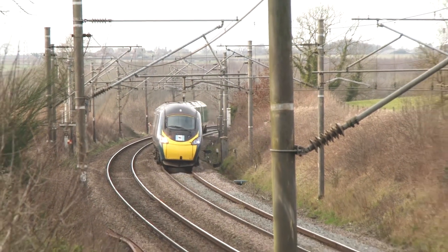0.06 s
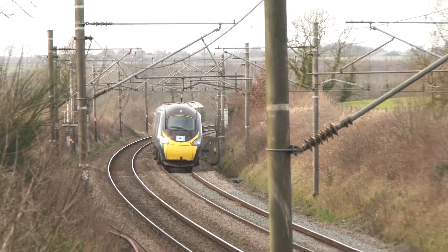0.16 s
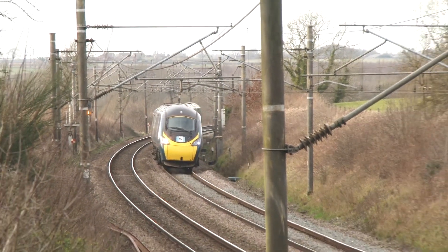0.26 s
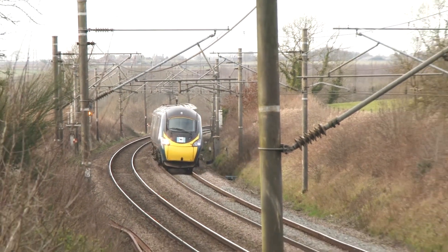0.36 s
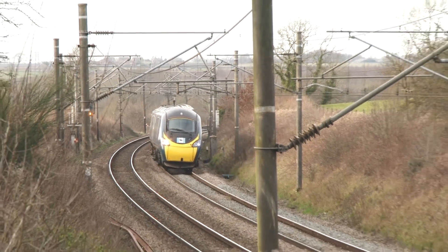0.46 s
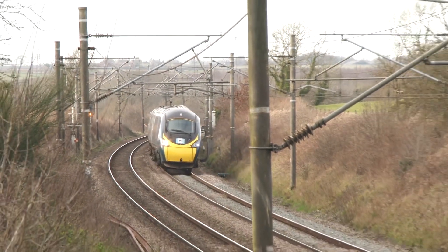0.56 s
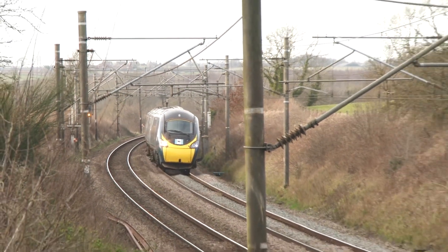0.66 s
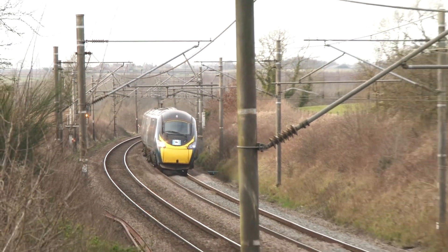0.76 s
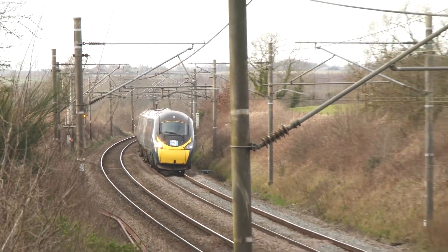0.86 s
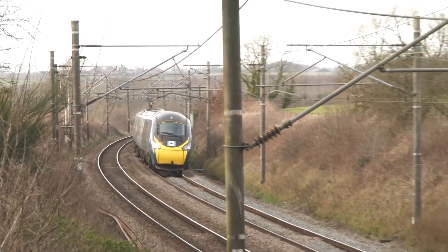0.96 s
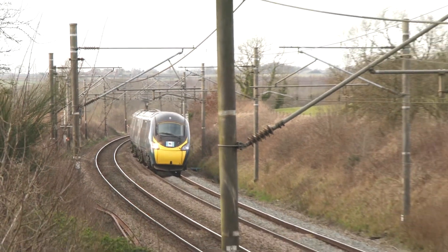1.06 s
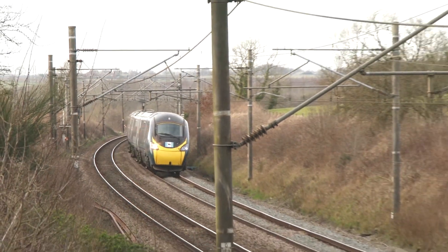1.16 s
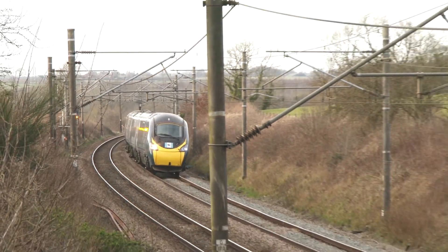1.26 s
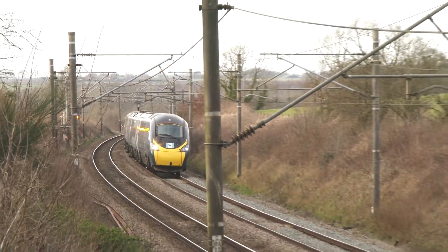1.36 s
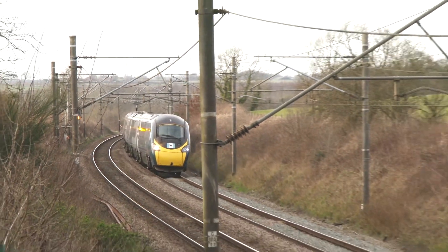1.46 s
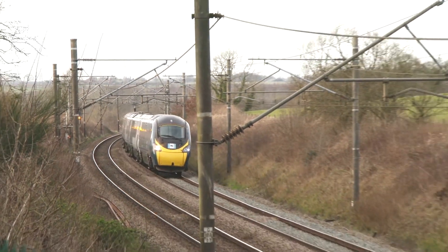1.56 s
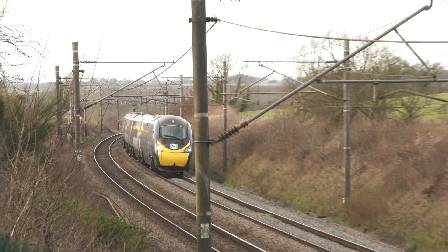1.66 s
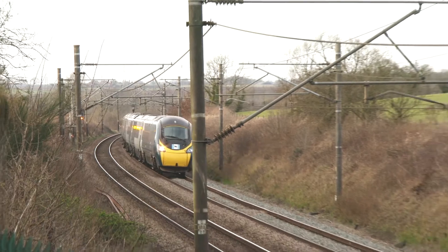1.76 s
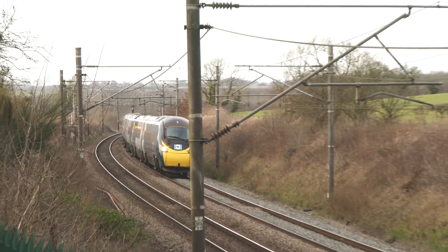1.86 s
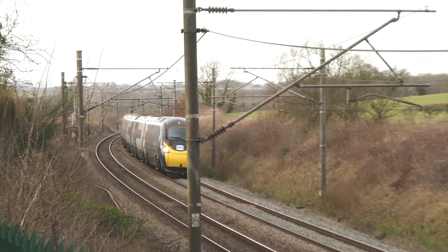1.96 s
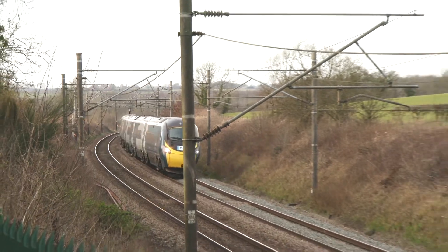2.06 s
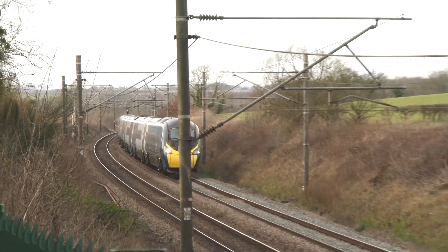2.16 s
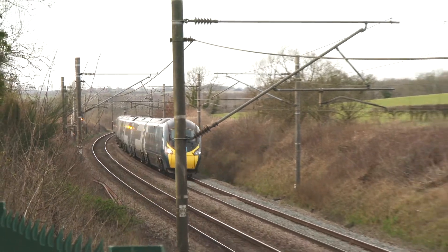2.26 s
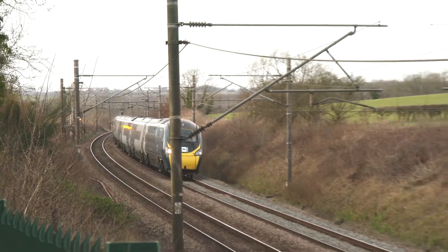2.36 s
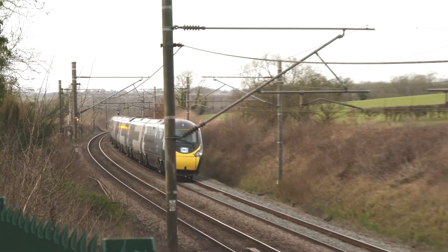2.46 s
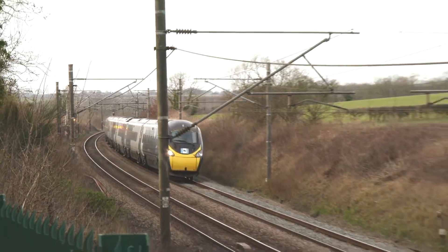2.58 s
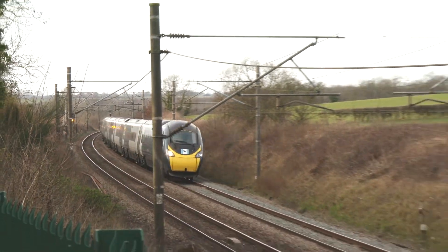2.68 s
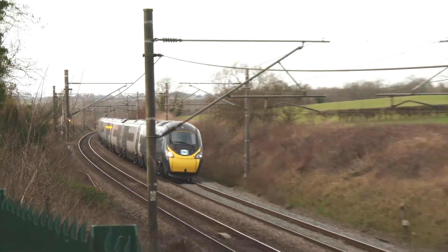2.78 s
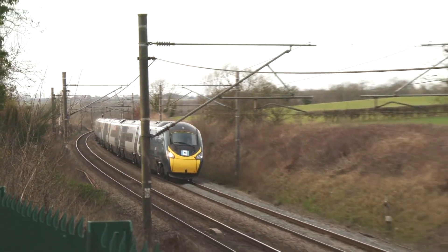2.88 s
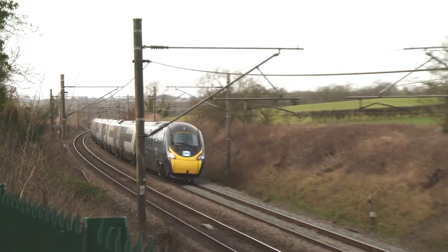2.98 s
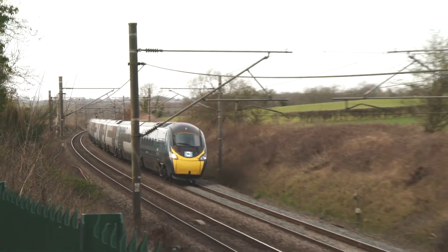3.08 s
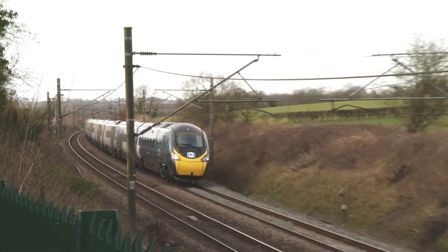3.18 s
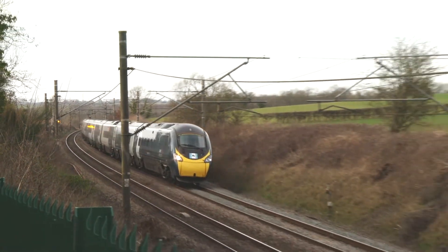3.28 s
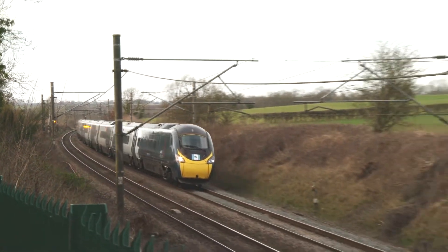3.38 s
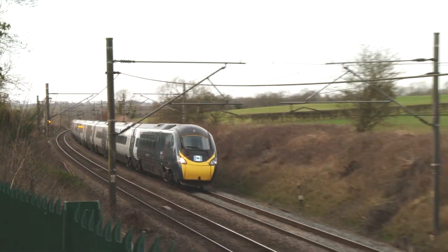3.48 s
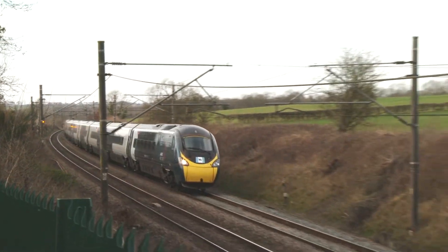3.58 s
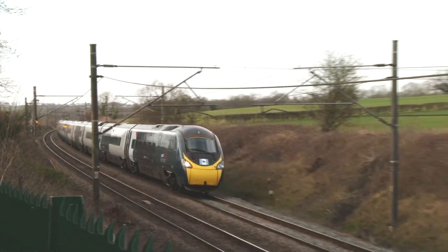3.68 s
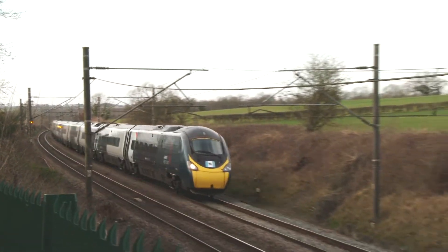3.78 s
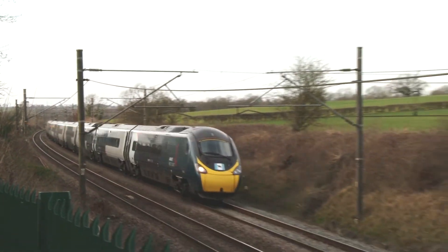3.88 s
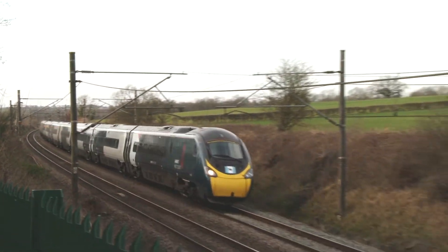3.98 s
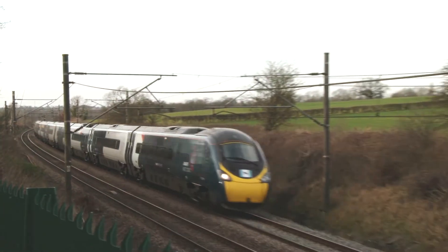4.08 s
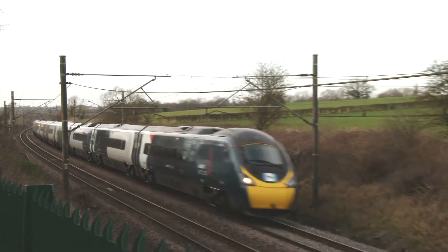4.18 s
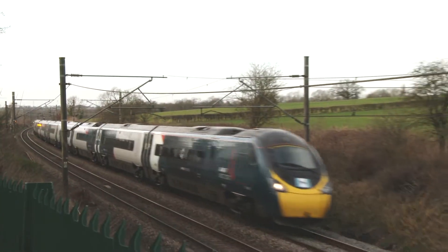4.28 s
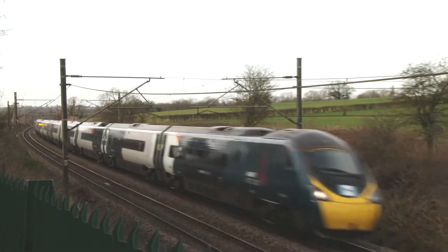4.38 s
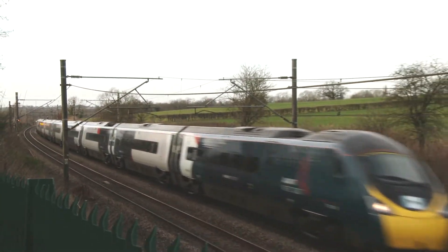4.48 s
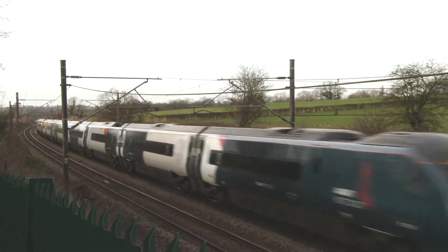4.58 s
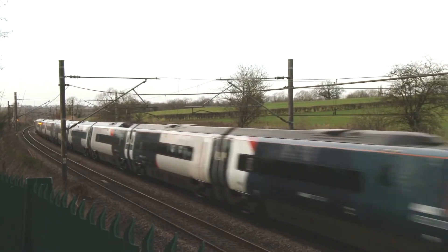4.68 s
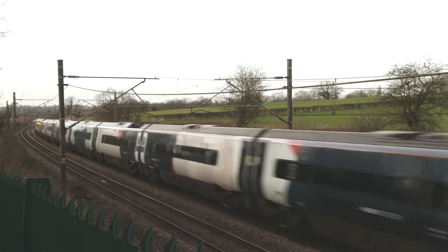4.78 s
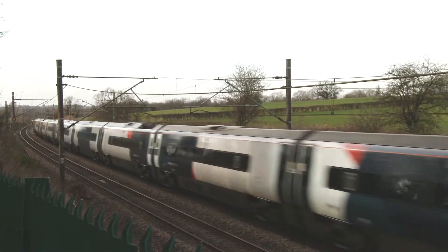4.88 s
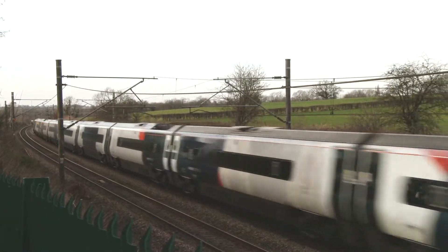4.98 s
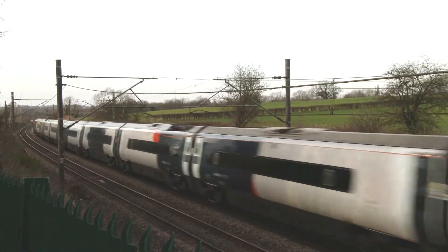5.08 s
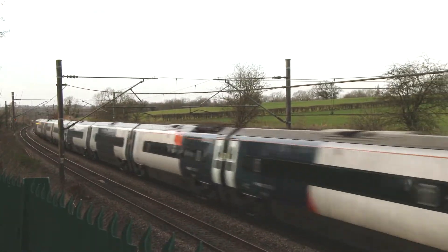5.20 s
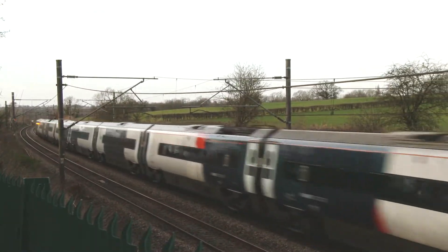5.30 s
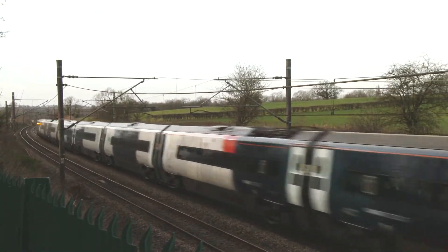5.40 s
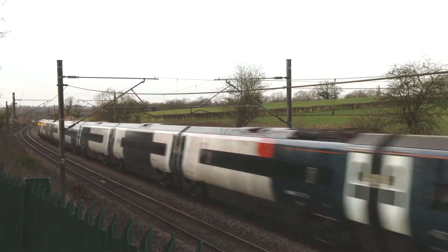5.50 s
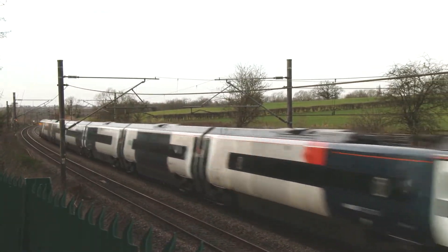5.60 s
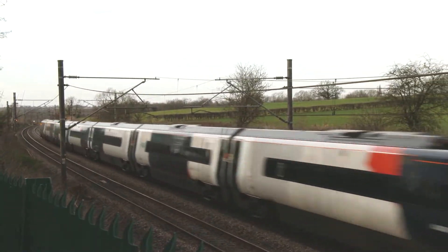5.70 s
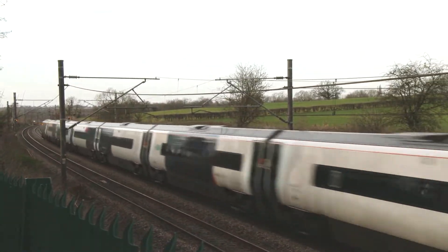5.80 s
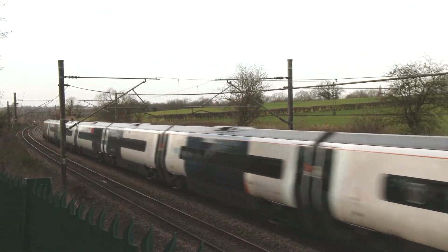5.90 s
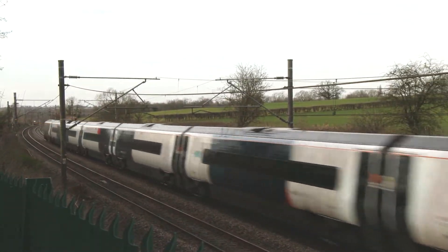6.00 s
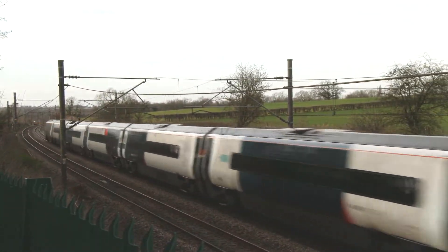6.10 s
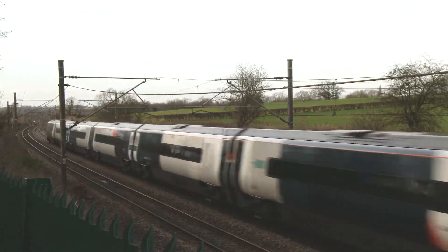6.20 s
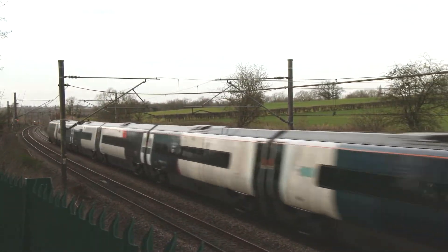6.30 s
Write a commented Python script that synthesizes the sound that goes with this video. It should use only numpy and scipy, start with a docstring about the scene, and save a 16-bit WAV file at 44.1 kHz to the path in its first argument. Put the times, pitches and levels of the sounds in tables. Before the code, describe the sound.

A fast electric train swells from distant singing rails and wheel patter into a loud, roaring rush of wheels and air close by.

```python
"""Open country: a fast electric train rounds a bend and sweeps close past, a little to the right.
Rails sing ahead of it as wavering tones; chirps once a turn make flat spots on three wheels patter.
Bogie rumble, air rush, wheel roar and hiss swell as noise shaped by band and distance.
Fine ripples on the rail head add tones that drop in pitch as the bogies pass; flanges squeal briefly."""
import sys
import numpy as np
from scipy import signal
from scipy.io import wavfile

SR = 44100
rng = np.random.default_rng(int(sys.argv[2]) if len(sys.argv) > 2 else 0)


def bounce(signal):
    """Save signal as a 16-bit WAV file at the path given by the first command-line argument."""
    frames = np.transpose(np.atleast_2d(signal))
    limited = np.clip(frames, -1, 1)
    pcm = np.round(limited * 32767).astype(np.int16)
    wavfile.write(sys.argv[1], SR, pcm)


N = 279939
TIME = np.arange(N) / SR
FRAME, HOP = 1024, 256  # samples
FRAME_S = np.arange(N // HOP + 2) * HOP / SR
BIN_HZ = np.maximum(np.arange(FRAME // 2 + 1) * SR / FRAME, 10)


def from_db(db):
    """Amplitude ratio of a level in dB."""
    return 10 ** (np.asarray(db) / 20)


def rms_one(x):
    """Scale to an rms of 1."""
    return x / np.sqrt(np.mean(np.abs(x) ** 2) + 1e-20)


def in_time(rows, at=TIME):
    """The columns of a curve, read at the given times."""
    s, *columns = np.transpose(rows)
    return [np.interp(at, s, column) for column in columns]


def at_hz(points, beyond=None):
    """A spectrum read at every bin, as a column, linear over log frequency."""
    hz, value = np.transpose(points)
    return np.interp(np.log(BIN_HZ), np.log(hz), value, beyond, beyond)[:, None]


def by_distance(stages, beyond=None):
    """A spectrum that passes through its stages, far to near, as the train closes in."""
    closing_s, abreast_s = 2.7, 5.4
    nearness = np.clip((FRAME_S - closing_s) / (abreast_s - closing_s), 0, 1)
    stage = nearness * (len(stages) - 1)
    return sum(np.maximum(1 - np.abs(stage - k), 0) * at_hz(points, beyond)
               for k, points in enumerate(stages))


def passing(peak_s, peak_db, rise_db_per_s, fall_db_per_s, at=TIME):
    """Level in dB of a sound that climbs evenly to its peak and then eases off."""
    before_s = np.maximum(peak_s - at, 0)
    after_s = np.maximum(at - peak_s, 0)
    return peak_db - rise_db_per_s * before_s - fall_db_per_s * after_s


def bell(s, length_s, at=TIME):
    """A smooth swell of height 1 around a moment."""
    return np.exp(-((at - s) / length_s) ** 2)


def surges(rows, at=TIME):
    """Extra dB from a table of brief surges and dips."""
    return sum(db * bell(s, length_s, at) for s, length_s, db in rows)


def drift(cutoff_hz, at=TIME):
    """Slow chance of spread 1: noise twice through a one-pole low-pass."""
    step_s, run_in = .001, 2000
    r = np.exp(-2 * np.pi * cutoff_hz * step_s)
    noise = rng.standard_normal(int(N / SR / step_s) + run_in)
    slow = signal.lfilter([1], [1, -2 * r, r * r], noise)[run_in:]
    return np.interp(at / step_s, np.arange(len(slow)), rms_one(slow))


def patches(cutoff_hz, count):
    """Slow chance of spread 1 over bins and frames, with independent drifts blended across bands."""
    band = np.log(BIN_HZ / BIN_HZ[0]) / np.log(BIN_HZ[-1] / BIN_HZ[0]) * (count - 1)
    share = np.sqrt(np.maximum(1 - np.abs(band[:, None] - np.arange(count)), 0))
    return share @ np.array([drift(cutoff_hz, FRAME_S) for _ in range(count)])


def waver(hz, width_hz, rough):
    """A complex tone: a steady part plus a randomly wavering part, within a narrow band."""
    rough = np.clip(rough, 0, 1)
    wavering = (drift(width_hz) + 1j * drift(width_hz)) / np.sqrt(2)
    carrier = np.exp(2j * np.pi * np.cumsum(hz + 0 * TIME) / SR)
    return (np.sqrt(1 - rough) + np.sqrt(rough) * wavering) * carrier


def chord(lines, width_hz, rough, sharpen=1):
    """Several wavering tones, together of rms 1, all shifted in pitch by one factor."""
    return rms_one(sum(from_db(db) * waver(hz * sharpen, width_hz, rough) for hz, db in lines))


def place(tone, pan_db, lag_rad):
    """A complex tone as a stereo pair: left minus right in dB, the left side lagging."""
    left = tone * from_db(pan_db / 2) * np.exp(-1j * lag_rad)
    right = tone / from_db(pan_db / 2)
    return np.sqrt(2) * np.real([left, right])


def white_frames():
    """Short-time spectra of white noise, unit mean power."""
    noise = rng.standard_normal(N + FRAME)
    spectra = signal.stft(noise, nperseg=FRAME, noverlap=FRAME - HOP)[2]
    return rms_one(spectra[:, :len(FRAME_S)])


def stereo_noise(power):
    """Noise with the given power per bin and frame midway between two closely spaced microphones."""
    # stages far to near, rows (frequency [Hz], diffuse share of the power [dB])
    diffuse = [
        [(60, -17), (170, -8), (400, -5.5), (600, -6.5), (1000, -4), (2700, -5.5), (4000, -3), (5900, -9),
         (7000, -4), (14000, -4)],
        [(60, -24), (250, -19), (600, -11), (1000, -5), (1600, -7), (2700, -7), (3500, -3.5), (4700, -4),
         (5900, -11), (7000, -6), (8000, -18), (14000, -19)],
        [(60, -22), (250, -13), (600, -8.5), (1000, -4), (1600, -6), (2700, -7), (3500, -3), (4700, -3),
         (5900, -11), (7000, -5), (8000, -20), (14000, -20)],
    ]
    # stages far to near, rows (frequency [Hz], left minus right [dB])
    balance = [
        [(60, 0), (110, 0), (200, 1), (380, 1.5), (700, -1), (1290, -5), (2380, 0), (4400, -.5), (8120, -1.5),
         (15000, 1)],
        [(60, 2), (110, 0.0), (200, -1.5), (380, -0.5), (700, -0.5), (1290, -5.5), (2380, -0.5), (4400, -2),
         (8120, 0), (15000, 2)],
        [(60, 2), (110, 0.5), (200, 2), (380, -0.5), (700, -4), (1290, -12.5), (2380, -8), (4400, -5),
         (8120, 0.5), (15000, -1.5)],
    ]
    # phase by which left leads: (frequency [Hz], phase [rad])
    phase_far = [(60, 0), (350, -.05), (700, -.7), (1000, -.6), (1500, -.1), (2700, -.15), (3500, -.6),
                 (4700, -.3), (5800, 0)]
    phase_near = [(60, -.15), (170, -.55), (350, -.85), (700, -1.3), (1000, -1.3), (1400, -.55),
                  (1900, -1.25), (2300, -.95), (2900, -1.2), (3450, -2.3), (4000, -1.9), (4800, -2.6),
                  (5600, 0)]
    alike = 1 - np.minimum(from_db(by_distance(diffuse)) ** 2, 1)
    lean = from_db(by_distance(balance) / 2)
    swing = np.interp(FRAME_S, (4.5, 5.05), [0, 1])  # the nose swings past to the side [s]
    phase = (1 - swing) * at_hz(phase_far) + swing * at_hz(phase_near)
    common = np.sqrt((1 + alike) / 2) * white_frames()
    apart = np.sqrt((1 - alike) / 2) * white_frames()
    midway = (lean ** 2 + lean ** -2 + 2 * alike * np.cos(phase)) / 4
    pair = np.array([(common + apart) * lean * np.exp(1j * phase), (common - apart) / lean])
    gain = np.sqrt(power / midway * .75)  # .75 offsets the window's noise gain
    return signal.istft(pair * gain, nperseg=FRAME, noverlap=FRAME - HOP)[1][:, :N]


def layer(stages, level_db, band_hz, flutter_db, patchy_db):
    """Power per bin and frame of one noise source, its level set within its main band."""
    colour_db = by_distance(stages, beyond=-100)
    power = from_db(colour_db + patchy_db * patches(6.1, count=36)) ** 2
    inside = (BIN_HZ >= band_hz[0]) & (BIN_HZ <= band_hz[1])
    return power / power[inside].sum(0) * from_db(level_db + flutter_db * drift(11, FRAME_S)) ** 2


def wash():
    """Power per bin and frame of the far-off train, which grows slowly and then holds."""
    # spectrum once full: (frequency [Hz], level [dB per Hz])
    full = [(25, -104), (65, -85.5), (110, -96.5), (160, -93), (240, -87), (330, -89.5), (500, -84.5),
            (650, -85.5), (830, -84.5), (1080, -81), (1600, -84.8), (2100, -85.3), (2700, -89.3),
            (3400, -101.5), (4000, -102), (4700, -107), (7150, -107), (8400, -116), (11000, -113.5),
            (14400, -128)]
    # growth until then: (frequency [Hz], rise [dB per s])
    rise = [(25, 1), (80, 3.7), (160, 1), (450, .5), (700, 2.3), (1600, 4.5), (3600, 3.3), (6000, 4.8),
            (14000, 3.8)]
    full_s = 1.7
    level_db = at_hz(full) - at_hz(rise) * np.maximum(full_s - FRAME_S, 0)
    return from_db(level_db) ** 2 * SR / FRAME  # per Hz to per bin


def bogie_rumble():
    """Bogies rumble: low noise that climbs to its peak and then eases off."""
    # colour, stages far to near, rows (frequency [Hz], relative level [dB per Hz])
    colour = [
        [(13, -46), (22, -19), (40, 2), (54, -5), (70, 7), (108, -8), (170, 1), (220, 2.5), (290, -30),
         (480, -120)],
        [(13, -55), (22, -46), (81, 2.5), (119, -2.5), (220, -0.5), (290, -30), (480, -120)],
    ]
    level_db = passing(4.85, -44, 10.8, 5.3, at=FRAME_S)
    return layer(colour, level_db, (25, 200), flutter_db=.3, patchy_db=.3)


def air_rush():
    """Air tears along the cars; the nose shoves a wave of it past and short buffets follow."""
    # colour, stages far to near, rows (frequency [Hz], relative level [dB per Hz])
    colour = [
        [(140, -27), (200, -12), (280, -2), (400, -2.5), (520, 0), (660, 9.5), (800, 3.5), (920, -2),
         (1150, -33)],
        [(140, -19), (200, -9.5), (300, -1), (410, -4), (510, 6), (620, 0.5), (800, 0), (920, -1.5),
         (1150, -19)],
        [(140, -19), (210, -9.5), (300, 0.5), (420, -0.5), (520, -1.5), (660, 6.5), (780, 3.5), (900, -6),
         (1150, -27)],
    ]
    # nose wave and buffets: (time [s], length [s], extra level [dB])
    buffets = [(4.8, .3, 1.2), (4.815, .01, 5), (4.85, .008, 3), (5.03, .015, 3), (5.37, .012, 3),
               (5.53, .012, 4), (6.215, .012, 4.5), (6.31, .012, 4)]
    level_db = passing(4.72, -30.9, 13.1, 4.1, at=FRAME_S) + surges(buffets, FRAME_S)
    return layer(colour, level_db, (200, 620), flutter_db=.27, patchy_db=1.03)


def wheel_roar():
    """Wheels and rails roar; its narrow bands waver in level at random."""
    # colour, stages far to near, rows (frequency [Hz], relative level [dB per Hz])
    colour = [
        [(700, -25), (920, 5.5), (1100, 1.5), (1320, 3.5), (1450, -5), (1750, -5.5), (2100, -9), (2700, -7),
         (3100, -18.5), (3700, -52)],
        [(700, -15), (920, -3), (1060, 2.5), (1320, -2), (1450, -3), (1750, -2.5), (2100, -1.5), (2700, -8.5),
         (3100, -10), (3700, -39)],
        [(700, -42), (920, -4.5), (1150, -6), (1350, -2.5), (1700, 2), (2100, 2), (2400, 0), (2800, -0.5),
         (3150, -5.5), (3700, -46)],
    ]
    # brief surges and dips: (time [s], length [s], extra level [dB])
    roar_surges = [(3.15, .1, 1), (3.98, .12, 1), (4.2, .08, -1), (4.56, .12, -1.8), (4.595, .012, 3.5),
                   (4.97, .07, -1.3), (5.09, .012, 2.2), (5.165, .012, 3), (5.207, .018, -4),
                   (5.285, .018, 2.8), (5.38, .012, 3), (5.53, .02, -2.8), (5.61, .012, 2), (5.68, .012, 2),
                   (5.77, .04, -1.5), (5.835, .012, 2.5), (5.91, .015, 2), (6.205, .022, -3.5)]
    band_waver_db, band_waver_cutoff_hz = 1.9, 9
    level_db = passing(5.05, -25.5, 10.3, 0, at=FRAME_S) + surges(roar_surges, FRAME_S)
    roar = layer(colour, level_db, (900, 3200), flutter_db=.1, patchy_db=1.0)
    return roar * from_db(band_waver_db * patches(band_waver_cutoff_hz, count=200)) ** 2


def contact_hiss():
    """The contact patches of wheel and rail hiss, in brief surges."""
    # colour, stages far to near, rows (frequency [Hz], relative level [dB per Hz])
    colour = [
        [(2700, -25), (3300, -1), (3900, 2.5), (4700, -2), (6200, -1), (6800, 2.5), (7600, -3), (8300, -12),
         (9100, -10), (10500, -2.5), (12500, -5), (14200, -10), (15500, -25)],
        [(2700, -25), (3300, -3), (3900, 0), (4600, -5), (5400, 3), (6800, 1), (7800, -2.5), (9000, -9),
         (10500, -9), (12000, -17), (14200, -25), (15000, -50)],
        [(2700, -18), (3300, 2.5), (4100, 4.5), (4900, -1.5), (5800, 0), (7000, -3.5), (8000, -5.5),
         (9000, -12.5), (10500, -14.5), (12000, -19.5), (14200, -29), (15000, -48)],
    ]
    # brief surges: (time [s], length [s], extra level [dB])
    hiss_surges = [(2.15, .28, 4), (3.35, .17, 1.8), (4.0, .12, 2.4), (4.5, .25, 2), (6.03, .1, 1.2)]
    level_db = passing(5.1, -34.1, 13.4, 0, at=FRAME_S) + surges(hiss_surges, FRAME_S)
    return layer(colour, level_db, (3300, 6300), flutter_db=.07, patchy_db=.6)


def band_swells():
    """Extra dB per bin and frame where one part of the rolling noise swells or sinks."""
    # (time [s], length [s], centre [Hz], extra level [dB])
    swells = [(.55, .2, 520, 3), (.86, .07, 900, 5), (1.55, .08, 1850, 3), (2.2, .35, 900, -2),
              (2.3, .4, 65, 4), (3.72, .07, 4000, -2), (3.97, .1, 4000, 2), (4.35, .1, 1100, 2),
              (4.81, .11, 1050, 3), (4.8, .25, 3900, -2.3), (5.8, .1, 6500, 1.8), (5.93, .06, 11000, 2.5),
              (6.28, .05, 4000, -3)]
    width_octaves = .45
    return sum(db * bell(s, length_s, FRAME_S) * bell(np.log2(hz), width_octaves, np.log2(BIN_HZ))[:, None]
               for s, length_s, hz, db in swells)


def rolling():
    """All rolling noise in stereo; it dips briefly as the train rounds the bend."""
    dip_s, dip_length_s, dip_db = 2.58, .27, -1.7
    power = wash() + bogie_rumble() + air_rush() + wheel_roar() + contact_hiss()
    swell_db = band_swells() + dip_db * bell(dip_s, dip_length_s, FRAME_S)
    return stereo_noise(power * from_db(swell_db) ** 2)


def ripple_tones(pitch_hz):
    """Wheels drum over rail-head ripples: a tone of moving pitch and a rougher one of fixed mean pitch."""
    # abrupt swells over rougher and smoother rail: (time [s], half length [s], extra level [dB])
    swells = [(2.22, .17, 5), (2.58, .07, -6), (2.89, .105, 12), (3.08, .06, -3), (3.6, .13, 5),
              (3.87, .13, -7), (4.22, .13, 3), (4.64, .12, 4.5)]
    second_hz = 1055
    swell_db = sum(db * np.exp(-((TIME - s) / half_s) ** 4) for s, half_s, db in swells)
    tone = from_db(passing(4.65, -36, 9.3, 11) + swell_db) * waver(pitch_hz, width_hz=12, rough=.12)
    second = from_db(passing(3.75, -48, 16, 6)) * waver(second_hz, width_hz=22, rough=.8)
    return place(tone + second, pan_db=-1.5, lag_rad=1.1)


def rail_singing(sharpen):
    """Rails sing far ahead: two surging main tones, which blur as more wheels join in, and side tones."""
    # fainter tones beside the main ones: (pitch from afar [Hz], relative level [dB])
    side_tones = [(6660, -3), (6970, -2), (7260, -1), (7320, -1), (7645, 0), (8040, -8)]
    # surges of each main tone: (time [s], length [s], extra level [dB])
    low_surges = [(.06, .13, 8), (.36, .05, 7), (.52, .04, 4), (.95, .12, -4), (1.26, .07, 5),
                  (2.0, .3, -3), (2.5, .04, 5), (2.62, .025, 6), (3.12, .05, 7), (4.0, .06, 6),
                  (4.43, .1, 7)]
    high_surges = [(.52, .04, 5), (.65, .06, 7), (.8, .04, 12), (.98, .07, 8), (1.06, .025, 7),
                   (1.29, .08, 9), (1.53, .04, 4), (1.99, .1, 10), (2.12, .04, 10), (2.92, .1, -5)]
    low_hz, high_hz = 6725, 7398  # from afar
    singing = from_db(-1.5) * chord(side_tones, width_hz=55, rough=.98, sharpen=sharpen)
    blur = np.interp(TIME, (2, 3.8), [.2, 1])
    for hz, rows in ((low_hz, low_surges), (high_hz, high_surges)):
        singing = singing + from_db(surges(rows)) * waver(hz * sharpen, width_hz=22, rough=blur)
    return place(from_db(passing(4.5, -55, 5.7, 3)) * singing, pan_db=-5, lag_rad=.9)


def rail_shimmer(sharpen):
    """The rails' fainter singing tones above the main ones."""
    # (pitch from afar [Hz], relative level [dB])
    lines = [(8690, -12), (9360, -8), (10030, 1), (10120, -7), (10712, -3), (11365, -4), (12035, -12),
             (12700, -13), (13370, -15), (14040, -17)]
    level = from_db(passing(4.2, -56.5, 7.4, 6))
    tones = level * chord(lines, width_hz=16, rough=.92, sharpen=sharpen)
    return place(tones, pan_db=1.5, lag_rad=.5)


def rail_song():
    """Ripple tone and singing rise together as the train turns towards the listener, then ease back."""
    # (time [s], ripple pitch [Hz])
    ripple_pitch = [(0, 703), (2.2, 706), (3.0, 708), (3.6, 710), (4.7, 713.5), (6.35, 706)]
    pitch_hz, = in_time(ripple_pitch)
    sharpen = pitch_hz / pitch_hz[0]
    return ripple_tones(pitch_hz) + rail_singing(sharpen) + rail_shimmer(sharpen)


def wheel_flats():
    """Each flat strikes once a turn; the rail spreads the blow into a chirp that settles and rings on."""
    # one row per wheel: (first blow [s], start pitch [Hz], end pitch [Hz], settling time [s])
    flats = [(.031, 1090, 1335, .005), (.009, 1370, 1120, .018), (.047, 1080, 980, .008)]
    # force of the blows, one curve per wheel: (time [s], level [dB])
    patter = [
        [(0, -66), (.4, -58.5), (.65, -55), (1.5, -55.5), (1.8, -50.3), (2.45, -50.5), (2.6, -62), (2.9, -59),
         (3.0, -49), (3.45, -42), (4.1, -44), (6.35, -50)],
        [(0, -72), (1.6, -62), (2.5, -59), (2.65, -48.5), (2.85, -47), (3.1, -53), (3.3, -45.5), (3.65, -44),
         (4.1, -46), (6.35, -50)],
        [(0, -70), (.8, -62), (2.2, -59), (3.0, -54), (3.7, -47), (6.35, -50)],
    ]
    # extra force of the hardest knocks, one list per wheel: (time [s], level [dB])
    hard_knocks = [
        [(.67, -57), (1.135, -56), (2.005, -45.5), (2.41, -46.3), (3.223, -44.5), (4.035, -38), (4.151, -37.5)],
        [(3.318, -46), (3.9, -43)],
        [],
    ]
    turn_s = .05803
    blow_delay_s, blow_length_s = .007, .0042
    ring_delay_s, ring_length_s, ring_db = .017, .008, -9
    out = 0
    for (first_s, start_hz, end_hz, settle_s), levels, knocks in zip(flats, patter, hard_knocks):
        turns_s = np.arange(first_s, N / SR, turn_s)
        scatter_db = .7 * rng.standard_normal(len(turns_s))
        force = from_db(in_time(levels, turns_s)[0] + scatter_db)
        for s, db in knocks:
            force[np.argmin(np.abs(turns_s - s))] += from_db(db)
        turn, age_s = np.divmod(np.maximum(TIME - first_s, 0), turn_s)
        blow = bell(blow_delay_s, blow_length_s, age_s)
        ring = from_db(ring_db) * bell(ring_delay_s, ring_length_s, age_s)
        pitch_hz = end_hz + (start_hz - end_hz) * np.exp(-age_s / settle_s)
        out = out + force[turn.astype(int)] * (blow + ring) * waver(pitch_hz, width_hz=70, rough=.07)
    return place(out, pan_db=-14, lag_rad=.5)


def microphone_hiss():
    """A faint even hiss, partly shared by both sides; the near train drowns it."""
    shared = rng.standard_normal(N)
    own = .65 * rng.standard_normal((2, N))
    return from_db(-78) * (shared + own)


def ripple_overtones():
    """Ripple overtones swell in turn: sharp from wheels that come, flat from wheels that leave."""
    # (pitch [Hz], relative level [dB])
    coming_lines = [(1378, 1), (2056, 1), (2740, -3)]
    leaving_lines = [(1288, -4), (1934, 3), (2584, -2), (3236, -9)]
    # (time [s], length [s], level [dB])
    coming_swells = [(4.77, .18, -34), (5.13, .1, -37), (5.5, .1, -39), (5.83, .13, -34)]
    leaving_swells = [(5.29, .1, -30.5), (5.65, .12, -35), (5.95, .1, -37), (6.3, .1, -29.5)]
    coming = sum(from_db(db) * bell(s, length_s) for s, length_s, db in coming_swells)
    leaving = sum(from_db(db) * bell(s, length_s) for s, length_s, db in leaving_swells)
    tones = coming * chord(coming_lines, width_hz=9, rough=.35)
    tones = tones + leaving * chord(leaving_lines, width_hz=9, rough=.3)
    return place(tones, pan_db=-8, lag_rad=.8)


def sliding_strands():
    """Overlapping strands of the ripple tone slide down by the Doppler effect as the bogies pass."""
    # (middle of the slide [s], loudest [s], length [s], level [dB])
    strands = [(5.04, 5.06, .12, -28.5), (5.08, 4.86, .15, -34), (5.41, 5.35, .08, -31.5),
               (5.53, 5.6, .07, -28.5), (5.66, 5.46, .13, -31), (5.83, 6.27, .17, -32),
               (5.95, 5.86, .08, -30), (6.09, 6.04, .08, -30), (6.42, 6.3, .06, -35)]
    middle_hz, doppler_share, sweep_s = 678, .06, .17
    slides = 0
    for middle_s, loudest_s, length_s, db in strands:
        pitch_hz = middle_hz * (1 - doppler_share * np.tanh((TIME - middle_s) / sweep_s))
        tone = waver(pitch_hz, width_hz=14, rough=.2)
        slides = slides + from_db(db) * bell(loudest_s, length_s) * tone
    return place(slides, pan_db=-3, lag_rad=1.2)


def flanges():
    """A flange catches the rail and rings one wheel mode, fading and falling ever more slowly in pitch."""
    # (start [s], length [s], pitch [Hz], initial glide [Hz per s], width [Hz], level [dB])
    squeals = [(5.05, .1, 2760, -500, 70, -29), (5.09, .06, 2630, -500, 40, -29),
               (5.15, .07, 3880, -600, 45, -35), (5.345, .05, 1605, -400, 20, -29),
               (5.345, .11, 4230, -1900, 60, -31), (5.41, .12, 2810, -400, 50, -28.5),
               (5.475, .05, 1685, -300, 25, -28.5), (5.48, .17, 4180, -1300, 70, -35),
               (5.61, .09, 3860, -900, 40, -33), (5.68, .12, 3760, -500, 55, -33),
               (5.72, .28, 5330, -2200, 70, -38.5), (5.89, .15, 2760, -500, 70, -29.5),
               (5.89, .13, 4230, -1200, 90, -33.5), (6.0, .15, 4060, -1000, 95, -30),
               (5.992, .13, 4840, -3300, 15, -25), (6.11, .14, 3310, -800, 45, -34)]
    attack_s, glide_s = .012, .15
    out = 0
    for s, length_s, hz, glide_hz_per_s, width_hz, db in squeals:
        since_s = np.clip(TIME - s, 0, 3 * length_s)
        envelope = (1 - np.exp(-since_s / attack_s)) * np.exp(-(since_s / length_s) ** 2)
        pitch_hz = hz + glide_hz_per_s * glide_s * np.tanh(since_s / glide_s)
        out = out + from_db(db) * envelope * waver(pitch_hz, width_hz, rough=width_hz / 90)
    return place(out, pan_db=-6, lag_rad=1.9)


def scene():
    """The whole pass, in stereo."""
    far = rail_song() + wheel_flats() + microphone_hiss()
    near = ripple_overtones() + sliding_strands() + flanges()
    return rolling() + far + near


def record(dry):
    """The top is cut steeply by an elliptic low-pass."""
    cutoff_hz = 15300
    return signal.sosfilt(signal.ellip(10, .1, 80, cutoff_hz, fs=SR, output="sos"), dry)


dry = scene()
out = record(dry)
bounce(out)
```